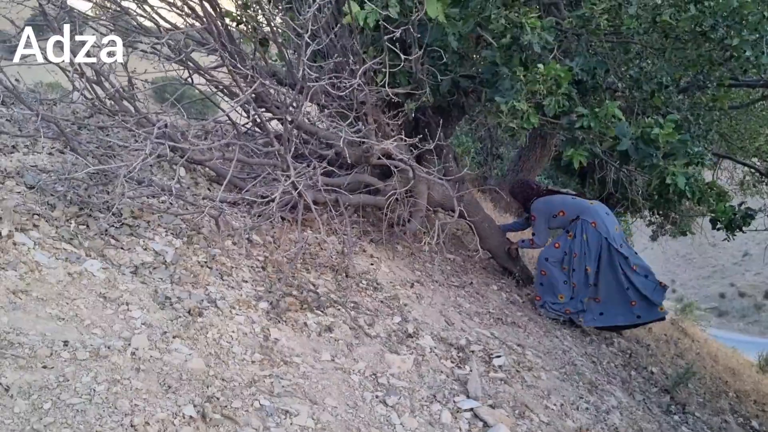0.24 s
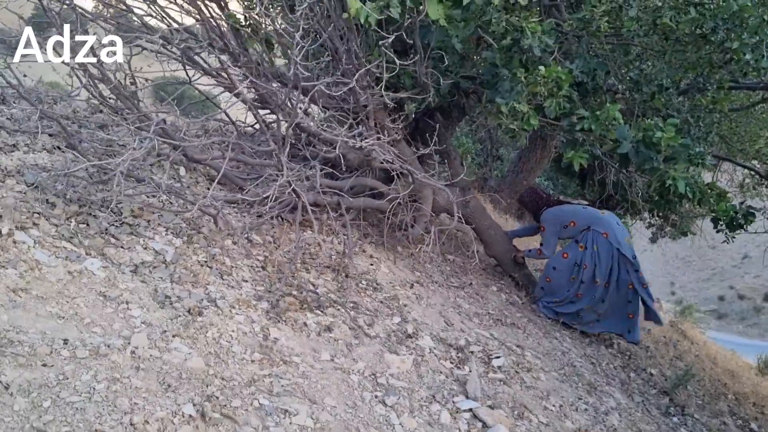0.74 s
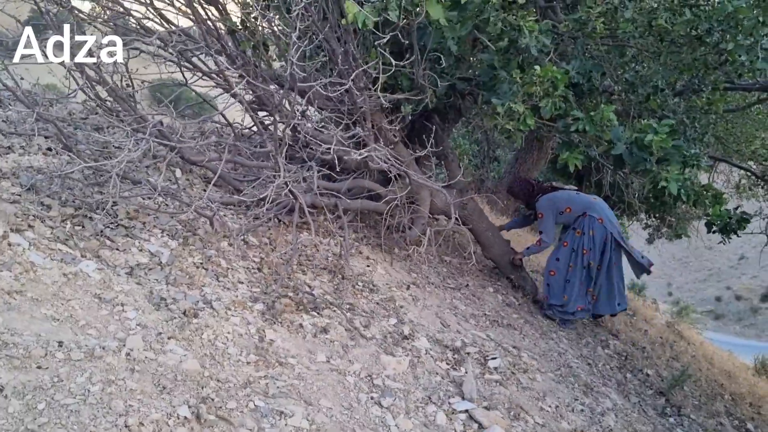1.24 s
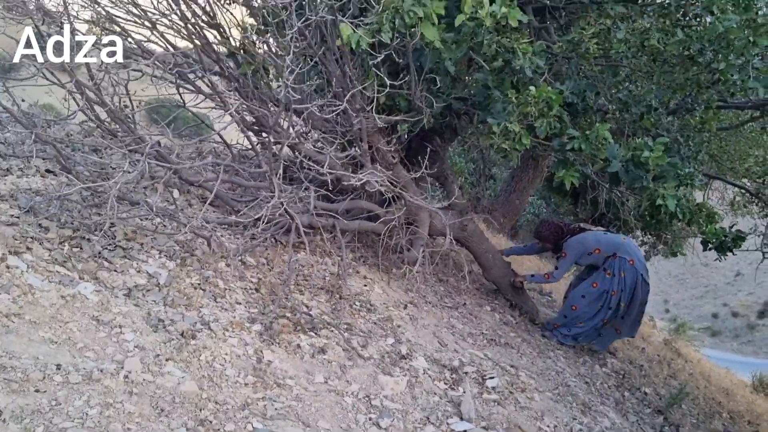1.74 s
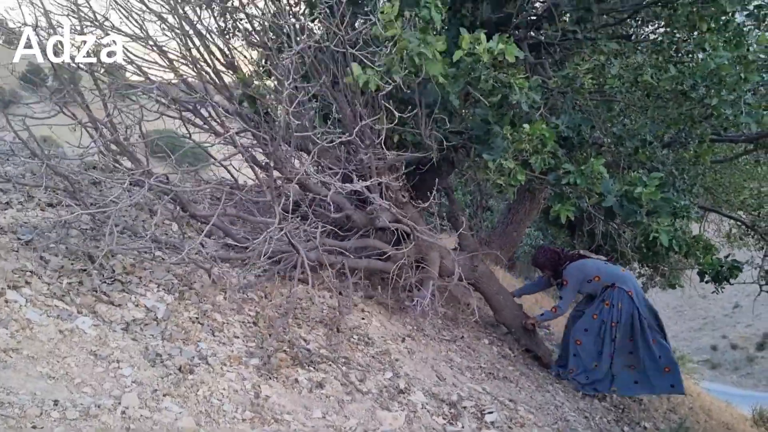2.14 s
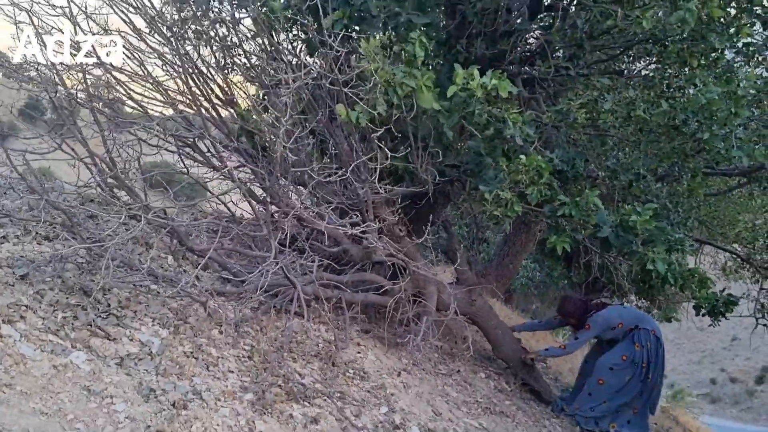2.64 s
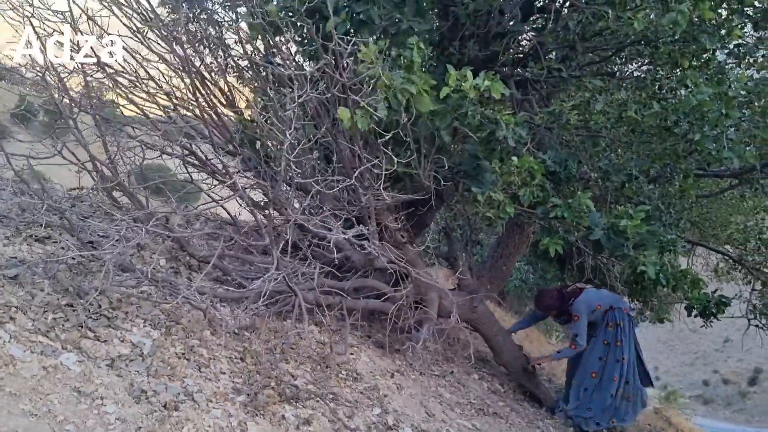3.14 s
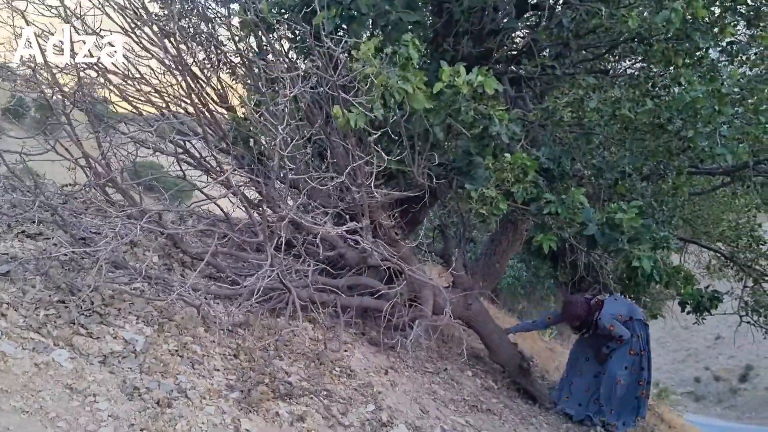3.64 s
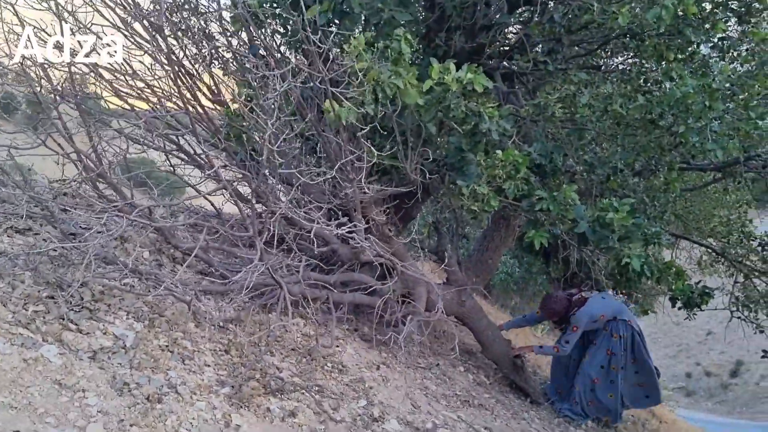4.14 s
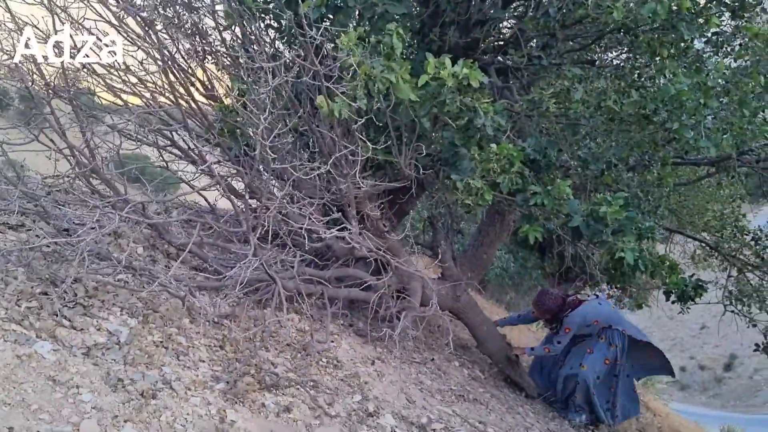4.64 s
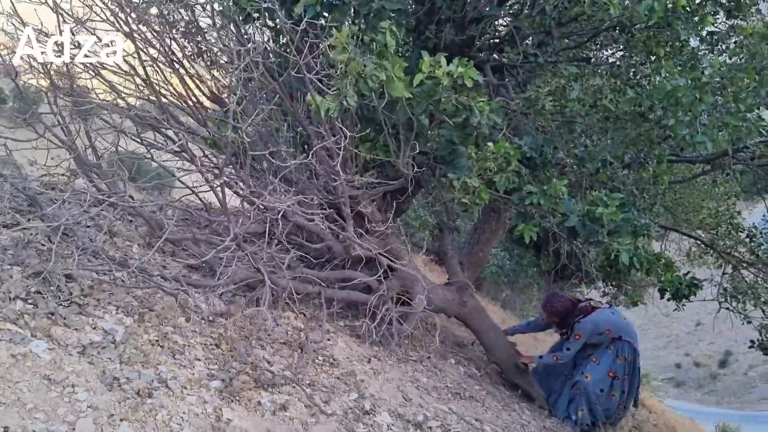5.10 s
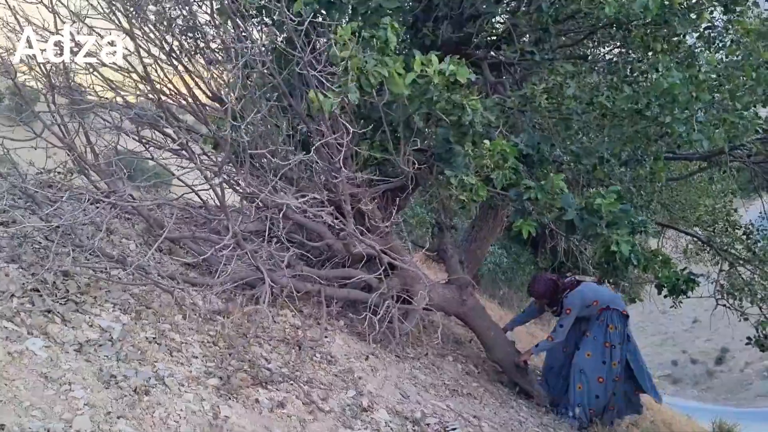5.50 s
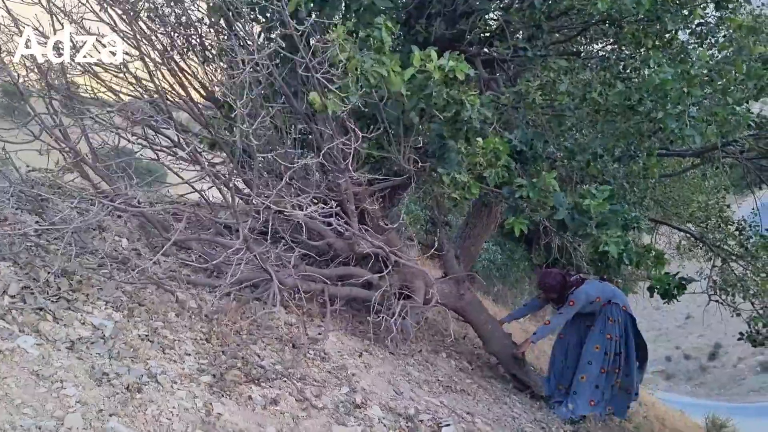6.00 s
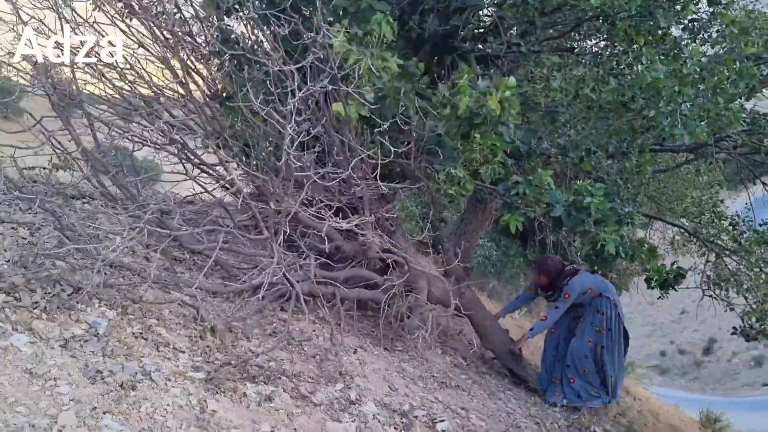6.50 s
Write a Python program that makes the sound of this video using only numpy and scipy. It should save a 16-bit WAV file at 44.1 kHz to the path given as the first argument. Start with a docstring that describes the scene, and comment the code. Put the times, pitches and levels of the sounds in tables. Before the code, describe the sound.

A dead limb is pulled back and forth on a tree on an open hillside. Each tug swells into dense dry crackling and scraping with sharp twig snaps, then stops quickly. Just before three seconds the limb breaks with one loud crack. Later pulls are stronger, with woody knocks, while low wind gusts buffet the hand-held microphone some metres away. Leaves hiss very faintly throughout.

```python
"""A dead limb is wrenched to and fro on a tree on an open hillside, some metres from a hand-held phone.
With each pull its dry twigs scrape and crackle against each other and some snap; once the limb itself cracks.
Leaves hiss faintly all the while, and in the second half gusts buffet the microphone."""
import sys
import numpy as np
from scipy import signal
from scipy.fft import rfft, irfft, next_fast_len
from scipy.io import wavfile
from scipy.ndimage import uniform_filter1d

SR = 44100
rng = np.random.default_rng(int(sys.argv[2]) if len(sys.argv) > 2 else 0)


def to_wav(sig):
    """Store sig (one row per channel, or 1-D mono) as 16-bit WAV at the path in sys.argv[1].

    Samples outside -1..1 are clipped; the rate is SR.
    """
    pcm = np.clip(np.atleast_2d(sig), -1, 1) * 32767
    pcm = np.round(pcm).astype(np.int16)
    wavfile.write(sys.argv[1], SR, pcm.T)  # frames by channels


N = 298116

# the clearest twigs snapping: (s, level over the first 10 ms dB, thickness 0-1)
SNAPS = [(.31, -59, .05), (.474, -59, 1.0), (.551, -46, .95), (.614, -38.5, .85), (.771, -47, .85), (.86, -42, .25), (1.019, -57, .65),
         (1.315, -61.5, .05), (1.716, -43, .6), (1.769, -43, .95), (1.824, -38, .2), (1.982, -33.5, .25), (1.989, -35, .5),
         (2.056, -38, .35), (2.076, -38.5, .2), (2.232, -52, .9), (2.329, -50, .15), (2.343, -50, .6), (2.378, -49, .4), (2.681, -38.5, .2), (2.884, -37, .1),
         (3.311, -61, .2), (3.397, -61, .15), (3.549, -54, .65), (3.626, -45, .4), (3.704, -40.5, .85), (3.752, -45, .3), (3.937, -56, .5), (4.196, -61, .1), (4.222, -58, .7), (4.778, -39, .75),
         (4.902, -35.5, .05), (4.939, -39, .8), (5.106, -37, .2), (5.226, -39.5, .5), (5.282, -41, .6), (5.317, -38.5, .05),
         (5.759, -51.5, .2), (5.866, -43, .25), (6.141, -30, .45), (6.3, -39, .9)]
# the limb breaking, levels over the first 10 ms: (s, woody body dB, bite dB, splinters dB)
BREAK = (2.7466, -29, -21.3, -28.5)
# what the limb rings with: (Hz, dB, t60 s)
LIMB = [(507, -0.5, 0.08), (603, 4.5, 0.11), (712, 0, .08), (903, -5, 0.15), (1045, -9.5, 0.064), (1310, -4, 0.056), (1750, 8, 0.093), (1804, 20, 0.027), (2150, 9, .07), (2830, 5.5, 0.047), (3300, 17, 0.036)]
# the three ranges of a crack, body, bite and splinters: (low Hz, high Hz, rise s, decay s, share scattered by the thicket dB)
RANGES = [(40, 1900, .0017, .005, -7), (1924, 8350, .00025, .0023, -12), (8330, 15700, .0001, .0017, -15)]
# colour of the dry wood and of the leaves: (Hz, dB per Hz)
WOOD = [(40, -3), (80, -1), (140, -4), (210, 2), (380, -7), (570, 5), (790, -4), (1050, 2), (1250, -3), (1550, 1.5), (2050, -1), (2900, 2), (4200, -1), (5300, 2.5)]
SPLINTERS = [(7800, 3), (9000, -3), (11000, -4.5), (15500, -3.5)]
LEAVES = [(30, 3), (100, 2), (250, 4), (600, 0), (1200, -1), (2200, -22.5), (4000, 0), (5200, 4), (7900, -2.5), (9500, -0.5), (11000, -5), (16000, -5)]
# likeness of the two microphone ports: (Hz, correlation)
LIKENESS = [(60, 0.48), (250, 0.89), (600, 0.97), (1500, 0.73), (2700, .58), (4000, 0.13), (8000, 0.16), (15000, 0.079)]
WIND_COLOUR = [(20, -16), (45, -1.5), (70, 2), (110, -10), (200, -23.5), (400, -32), (1200, -63)]  # (Hz, dB per Hz)
# the hardest buffets: (s, peak dB, Hz, half length s, left minus right dB)
BUFFETS = [(1.545, -58, 104, .011, 14), (4.223, -37, 72, .009, 19), (4.263, -35.5, 112, .0074, 20), (4.447, -37, 84, .0065, 22),
           (4.577, -36, 101, .0076, 31), (4.783, -28.5, 72.5, .023, -1.5), (5.194, -41, 61, .02, 6), (6.615, -44, 88, .013, 12)]
PORT_LAG_S = 5.5e-5
TOP_HZ = 15950  # fixed
T = np.arange(N) / SR
# sticks knocking together: (s, peak dB, Hz)
KNOCKS = [(.863, -41, 1410), (3.706, -42, 1646), (5.028, -30, 1470), (5.284, -39, 1051), (6.143, -25, 4100), (6.303, -26, 3280), (6.543, -48, 1603), (6.578, -53, 700)]
# light brushes of twigs and leaves between the pulls: (s, dB, Hz, half length s)
BRUSHES = [(.17, -68, 1950, .06), (.35, -63, 5000, .02), (1.475, -65, 4500, .02), (4.57, -65, 7640, .025), (5.488, -62, 5160, .04)]
# pulls on the limb: (full force at s, held for s, fine twigs dB, thick sticks dB, build-up s, growth while held dB)
PULLS = [(0.0, .02, -54.5, -63, .1, 0), (.15, .06, -58.5, -69, .25, 0), (.6, .25, -45, -50.5, .25, -3), (1.72, .36, -39.5, -45, .14, 6),
         (2.69, .23, -41, -47, .25, 1), (3.65, .14, -47, -53, .19, 3), (4.23, .14, -65, -67, .1, 1),
         (4.91, .26, -38, -43.5, .32, 0), (6.03, .28, -34.5, -43.5, .33, 2)]
BUILD_DB = 24  # rise over the build-up
RELEASE_DB_PER_S = 180  # the scraping stops as the hands let go ...
SETTLE_DB, SETTLE_DB_PER_S = -6, 42  # ... and the crown sways to rest
REST_DB = (-71.5, -87)  # twigs and sticks stirring between pulls
STICK_SWELL = 1.25  # the sticks come in and drop out more steeply than the twigs
THIN_DB, THICK_DB = (-20, 0, 3), (0, 0, -13)  # body, bite and splinters of the thinnest and the thickest twig
SMALL_SNAPS_PER_S, SMALL_SNAP_DB, SMALL_SNAP_SPREAD_DB = 4, -4.5, 2  # lesser snaps, relative to the crackle around them
# gusts on the microphone: (arrives s, lasts s, level dB)
GUSTS = [(1.44, .11, -66), (4.1, .22, -47.5), (4.4, .55, -51.5), (5.15, .25, -54.5), (5.56, .15, -58.5), (5.87, .02, -53), (6.0, .15, -63), (6.6, .15, -62.5)]
GUST_RISE_DB_PER_S, GUST_FALL_DB_PER_S = 330, 90


def undb(db):
    """Decibels to gain."""
    return 10 ** (np.asarray(db) / 20)


def unit(x):
    """Scale to rms 1."""
    return x / np.sqrt(np.mean(x ** 2))


def along(points, hz):
    """Read (Hz, value) points on a log-frequency axis."""
    at, value = np.transpose(points)
    return np.interp(np.log(hz + 1), np.log(at), value)


def walk(rate):
    """Slow chance: random levels joined smoothly, spread near 1."""
    k = max(int(SR / rate), 1)
    return 1.56 * uniform_filter1d(np.repeat(rng.standard_normal(N // k + 1), k), k)[:N]


def port_noise(colour, low_hz=20, high_hz=20000):
    """Coloured noise at two ports: alike in the bass, unrelated in the treble, reaching the left port first."""
    size = next_fast_len(N)
    hz = np.arange(size // 2 + 1) * SR / size
    mid, side = rfft(rng.standard_normal((2, size)))
    alike = np.clip(along(LIKENESS, hz), 0, 1)
    mid, side = mid * np.sqrt(1 + alike), side * np.sqrt(1 - alike)
    pair = np.array([mid + side, (mid - side) * np.exp(-2j * np.pi * hz * PORT_LAG_S)])
    return unit(irfft(pair * undb(along(colour, hz)) * (hz > low_hz) * (hz < high_hz), size)[:, :N])


def spread(x, pan_db):
    """Lean a sound to the left (+) or right (-)."""
    return x * undb(np.array([[pan_db], [-pan_db]]) / 2)


def crack(grain, range_db, thicket_s, slope_db=-36, slope_s=0.048, size=11000):
    """One fracture: a sharp front whose lows come later, scattered by the thicket and faintly by the slope."""
    t, out = T[:size], 0
    for noise, db, (_, _, rise_s, decay_s, scatter_db) in zip(grain, range_db, RANGES):
        start = rng.integers(N - size)
        fall = np.exp(-t / decay_s) + undb(scatter_db) * np.exp(-t / thicket_s) + undb(slope_db) * np.exp(-t / slope_s)
        burst = noise[:, start:start + size] * (1 - np.exp(-t / rise_s)) * fall
        out = out + undb(db) * burst / burst[:, t < .01].std()  # fixed
    return out


def add(track, s, sound):
    """Mix a sound in at time s."""
    start = max(int(s * SR), 0)
    track[:, start:start + sound.shape[1]] += sound[:, :N - start]


def crackle(grain, range_db, level_db, rate, scatter_db, spurt_db, ring_db, lowest_hz, count=14):
    """Many twigs, each with its own tick, catch and slip in spurts; a harder pull brings more slips."""
    size = next_fast_len(N + 12000)  # fixed
    busy = rate * undb(.35 * (level_db - level_db.max()))
    share = np.array([undb(spurt_db * walk(35)) for _ in range(count)])
    share = share / np.sqrt(np.mean(share ** 2, axis=0))  # the load passes from twig to twig
    ticks = 0
    for load in share:
        slips = np.flatnonzero(rng.random(N) < busy / count / SR)
        strength = unit(undb(scatter_db * np.minimum(rng.exponential(size=len(slips)), 3)))
        force = np.zeros(N)
        force[slips] = strength * rng.choice([-1, 1], len(slips)) * (load * undb(level_db) / np.sqrt(busy / SR))[slips]
        tick = twig(crack(grain, range_db + 2 * rng.standard_normal(3), thicket_s=.011), ring_db, lowest_hz)
        ticks = ticks + rfft(force, size) * rfft(tick / np.sqrt(np.sum(tick ** 2) / 2), size)
    return irfft(ticks, size)[:, :N]


def dragging(grain, twig_db, stick_db):
    """Thick sticks scrape low, fine twigs crackle high, and dry bark rubs as a hiss under both."""
    sticks = crackle(grain, np.array([0., -4, -30]), stick_db, rate=1600, scatter_db=3.5, spurt_db=5, ring_db=3, lowest_hz=(500, 1500))
    twigs = crackle(grain, np.array([-30., 0, -5]), twig_db, rate=2400, scatter_db=4, spurt_db=4.2, ring_db=2, lowest_hz=(1900, 3400))
    rub = (grain[1] * undb(2.0 * walk(90)) + undb(-6.5) * grain[2] * undb(2 * walk(120))) * undb(twig_db)
    bough = grain[0] * undb(stick_db - 4.5 + 2.3 * walk(40))  # the heavy wood grates too
    return undb(-.5) * sticks + bough + spread(undb(-2) * twigs + undb(-7) * rub, -.4)


def snapping(grain, twig_db, tear_s=.003, fibre_db=-18, count=3):
    """A few fibres tear first, then the twig parts and rings: thick ones with more body, thin ones with more splinters."""
    out = np.zeros((2, N))
    for s, db, thickness in SNAPS + small_snaps(twig_db):
        range_db = db + (1 - thickness) * np.array(THIN_DB) + thickness * np.array(THICK_DB)
        for early in rng.random(count):
            add(out, s - early * tear_s, undb(fibre_db - 7.2 * early) * crack(grain, range_db, thicket_s=.006))
        add(out, s + .001, twig(crack(grain, range_db, thicket_s=.011), ring_db=-1, lowest_hz=(900, 3200)))
    return spread(out, -0.9)


def breaking(grain, tear_db=-39, front_db=-8, ring_db=-34, front_s=.0006, echo_s=.013, size=11000):
    """The limb tears, gives with one loud crack that the ground throws back, and rings briefly in its own modes."""
    s, *range_db = BREAK
    t, out = T[:size], np.zeros((2, N))
    ring = sum(undb(db) * np.sin(2 * np.pi * (hz * t + rng.random())) * undb(-60 * t / t60) for hz, db, t60 in LIMB)
    ring = undb(ring_db) * ring * (1 - np.exp(-t / 0.0012))
    front = undb(front_db) * (grain[1] + undb(-6) * grain[2])[:, :size] * np.exp(-t / front_s)
    add(out, s - .0045, undb(tear_db) * crack(grain, (-20, -4, -4), thicket_s=.006))
    add(out, s, front + ring + crack(grain, range_db, thicket_s=.012, size=size))
    add(out, s + echo_s, undb(-14) * crack(grain, range_db, thicket_s=.016))
    thin = signal.butter(2, 220, "high", fs=SR, output="sos")  # the break carries no deep bass
    return spread(signal.sosfilt(thin, out), -1)


def foliage():
    """Green leaves stir in the breeze, a little more on the right; now and then a spray brushes past another."""
    hiss = port_noise(LEAVES)
    brush = sum(unit(resonate(hiss, hz, 4)) * undb(db) * np.exp(-((T - s) / half_s) ** 2) for s, db, hz, half_s in BRUSHES)
    return spread(hiss * undb(-71.5 + 1.2 * walk(4.6) + 1 * walk(30)), -5.0) + brush * undb(2.5 * walk(120))


def wind(calm_db=-84):
    """Eddies rumble on each port separately; the strongest push the diaphragms for a few slow cycles."""
    out = spread(port_noise(WIND_COLOUR) * undb(np.maximum(gusting(), calm_db) - 3.5 + 2.6 * walk(24)), 8.4)
    flutter = port_noise([(60, 1.5), (250, -2), (450, -21.5), (1500, -52)])
    for s, db, hz, half_s, pan_db in BUFFETS:
        t = T[:SR // 4] - .125  # fixed
        start = rng.integers(N - len(t))
        push = np.cos(2 * np.pi * (hz * t + rng.random())) + .19 * flutter[:, start:start + len(t)]
        add(out, s + t[0], spread(undb(db) * np.exp(-(t / half_s) ** 2) * push, pan_db) / np.mean(undb([pan_db / 2, -pan_db / 2])))
    return out


def resonate(x, hz, q):
    """One resonance, gain 1 at its centre."""
    return signal.lfilter(*signal.iirpeak(min(hz, SR / 3), q, fs=SR), x)


def twig(x, ring_db, lowest_hz, q=14):
    """A twig of random length moves part of the energy into the first bending modes of a bar."""
    hz = np.exp(rng.uniform(*np.log(lowest_hz)))
    modes = sum(resonate(x, hz * ratio, q) for ratio in (1, 2.76, 5.4))  # fixed
    return unit(x + undb(ring_db) * modes) * x.std()


def knocking(grain, t60=.028, size=6000):
    """A stick strikes another and sounds one short woody note with a weaker overtone."""
    out = np.zeros((2, N))
    for s, db, hz in KNOCKS:
        blow = crack(grain, (0, 0, -20), thicket_s=0.011, size=size)
        note = resonate(blow, hz, hz * t60 / 2) + undb(-9) * resonate(blow, 2.76 * hz, hz * t60 / 2)
        add(out, s, undb(db) * note / np.abs(note).max())
    return out


def pulling(levels_db, rest_db, swell=1):
    """Level of the rustle in dB: each pull builds up, holds, lets go, and leaves the crown settling."""
    power = undb(rest_db) ** 2
    for (s, hold_s, _, _, build_s, growth_db), db in zip(PULLS, levels_db):
        before, after = np.maximum(s - T, 0), np.maximum(T - s - hold_s, 0)
        held = db + growth_db * (np.clip((T - s) / hold_s, 0, 1) - .5)
        release = np.maximum(-RELEASE_DB_PER_S * after, SETTLE_DB - SETTLE_DB_PER_S * after)
        power = power + undb(held + swell * (release - BUILD_DB * before / build_s)) ** 2
    return 10 * np.log10(power)


def small_snaps(twig_db):
    """Lesser twigs give way at random, as loud as the pull allows: rows like those of SNAPS."""
    draws = rng.random((64, 3))[:int(SMALL_SNAPS_PER_S * N / SR)]  # fixed
    return [(when * T[-1], twig_db[int(when * N)] + SMALL_SNAP_DB + SMALL_SNAP_SPREAD_DB * (2 * force - 1), thickness)
            for when, force, thickness in draws]


def gusting():
    """Level of the wind in dB: each gust arrives quickly, blows a while and dies away."""
    return np.max([db - GUST_RISE_DB_PER_S * np.maximum(s - T, 0) - GUST_FALL_DB_PER_S * np.maximum(T - s - lasts_s, 0)
                   for s, lasts_s, db in GUSTS], axis=0)


def scene():
    """Wood, leaves and wind together."""
    grain = [port_noise(colour, low, high) for colour, (low, high, *_) in zip((WOOD, WOOD, SPLINTERS), RANGES)]
    _, _, twigs_db, sticks_db, _, _ = np.transpose(PULLS)
    twig_db, stick_db = pulling(twigs_db, REST_DB[0]), pulling(sticks_db, REST_DB[1], STICK_SWELL)
    return dragging(grain, twig_db, stick_db) + snapping(grain, twig_db) + knocking(grain) + breaking(grain) + foliage() + wind()


def record(dry):
    """The phone cuts the top."""
    return signal.sosfilt(signal.ellip(10, .2, 70, TOP_HZ, fs=SR, output="sos"), dry)


dry = scene()
out = record(dry)
to_wav(out)
```